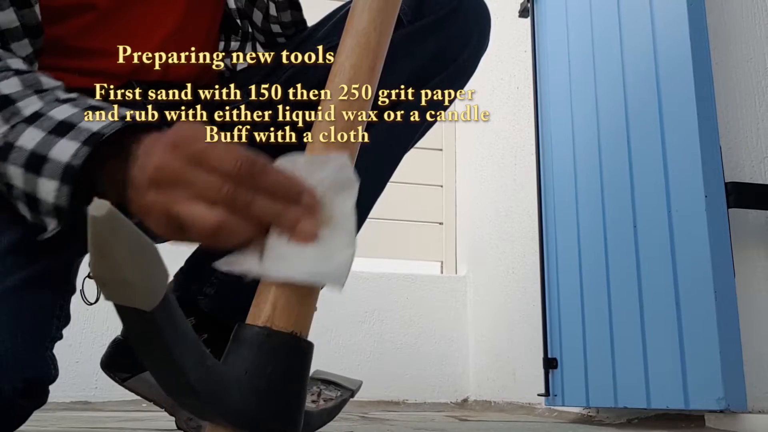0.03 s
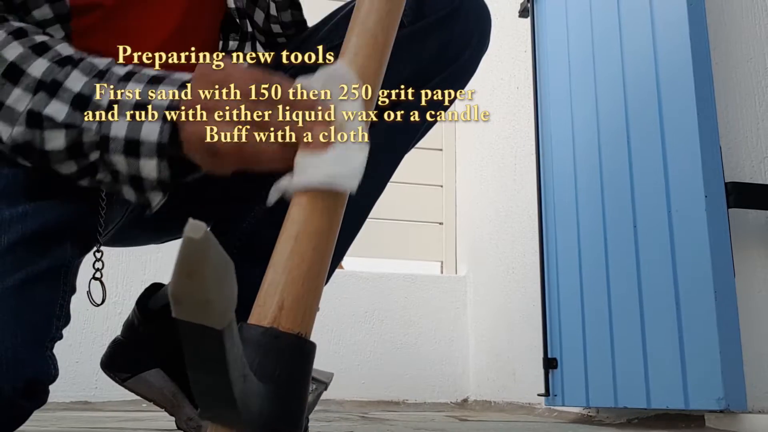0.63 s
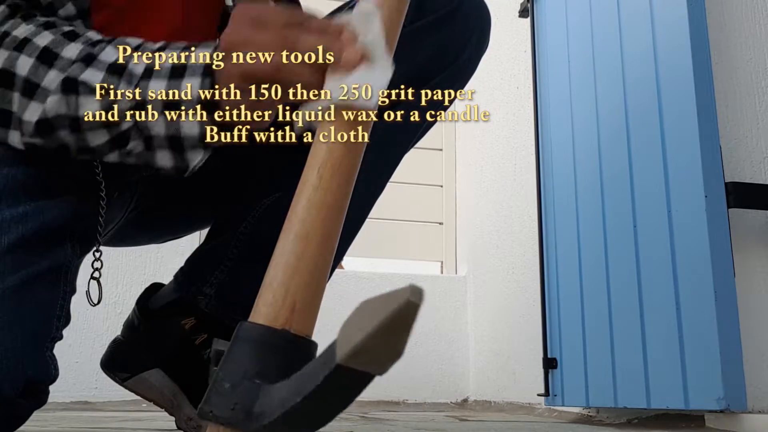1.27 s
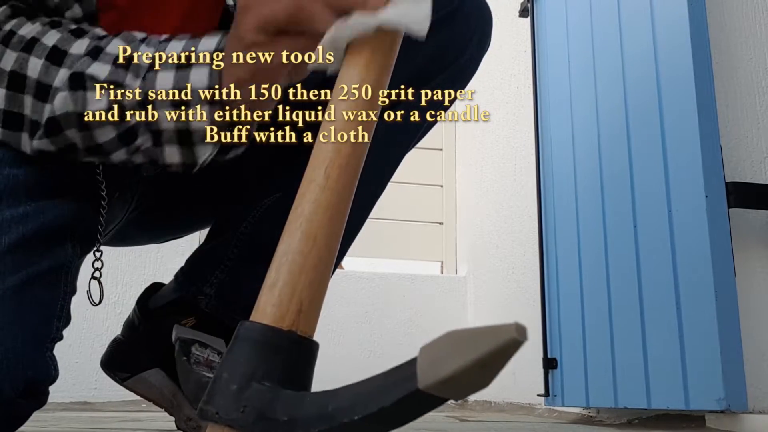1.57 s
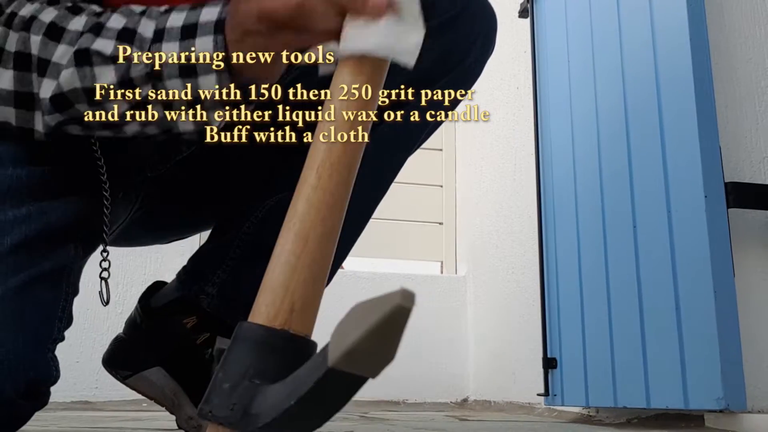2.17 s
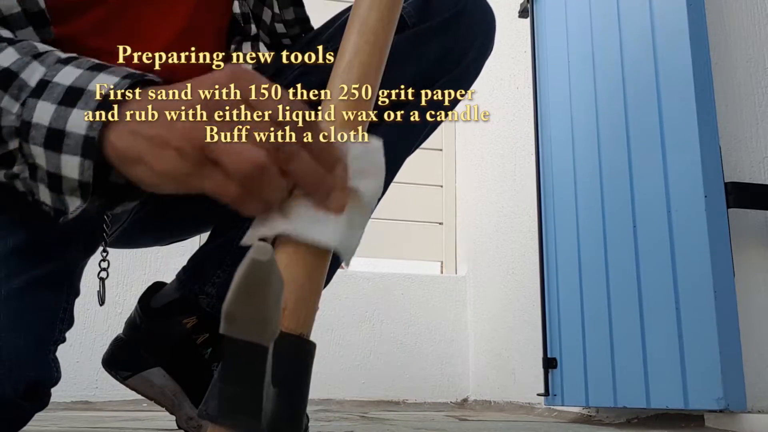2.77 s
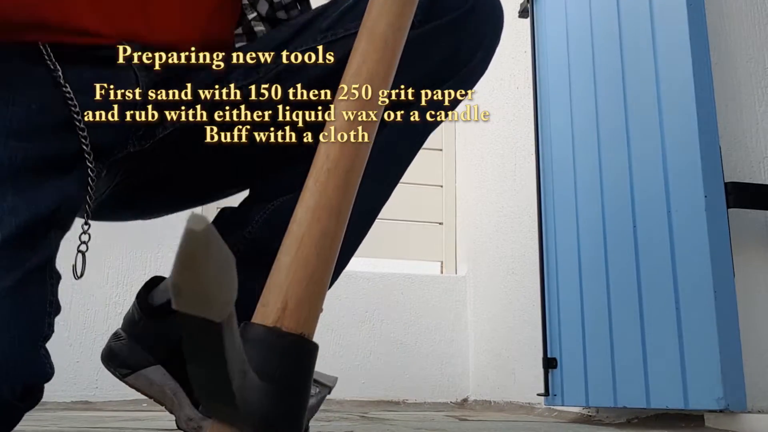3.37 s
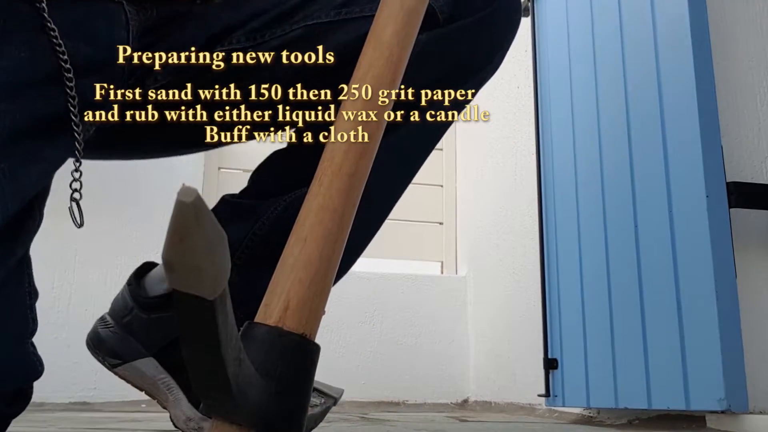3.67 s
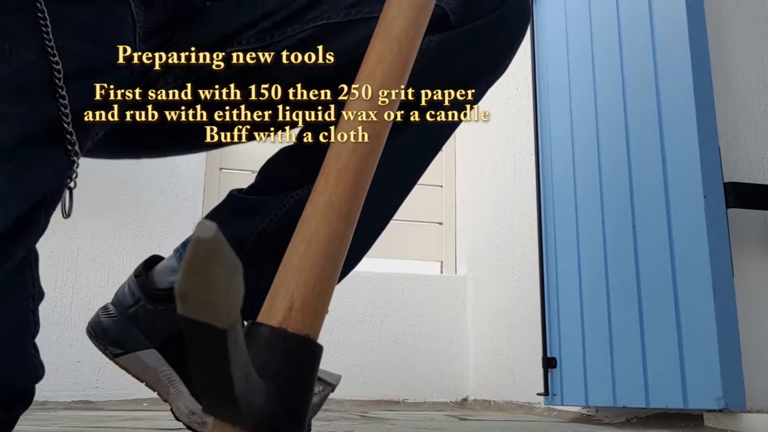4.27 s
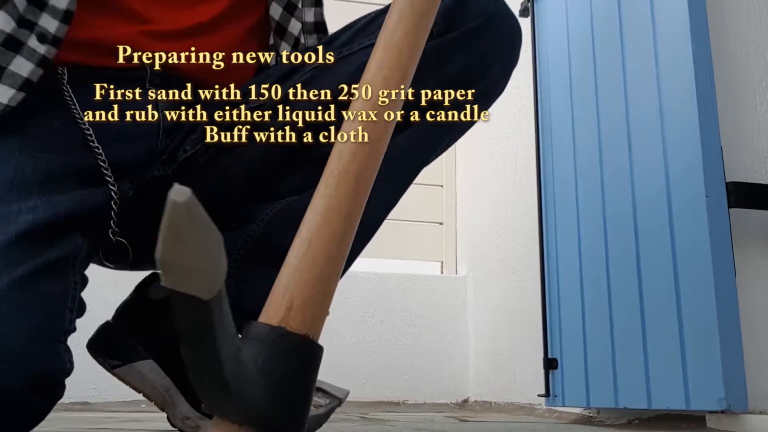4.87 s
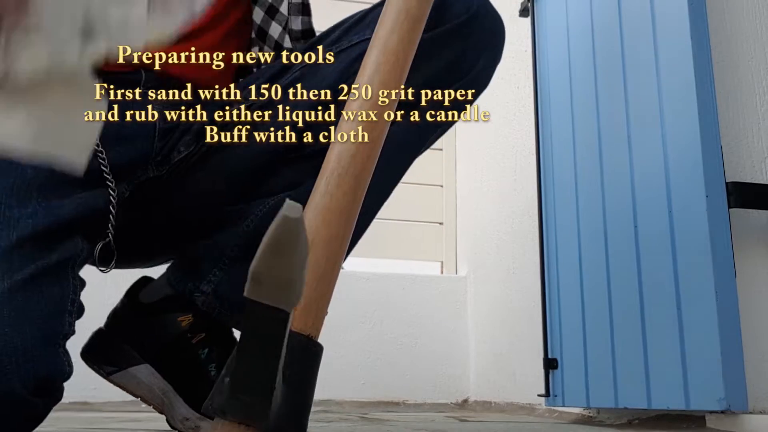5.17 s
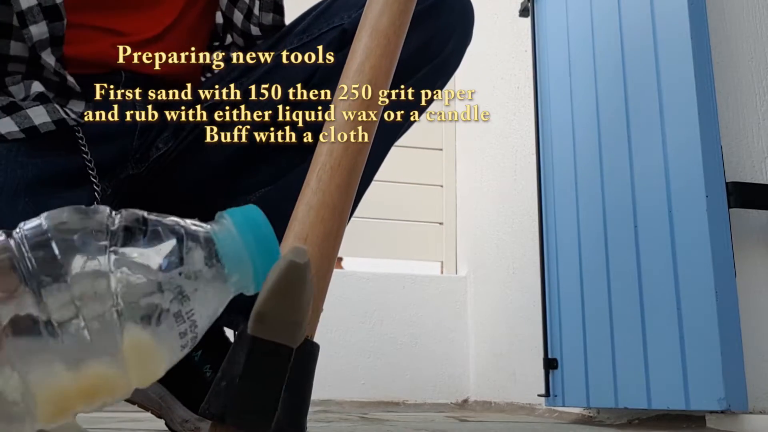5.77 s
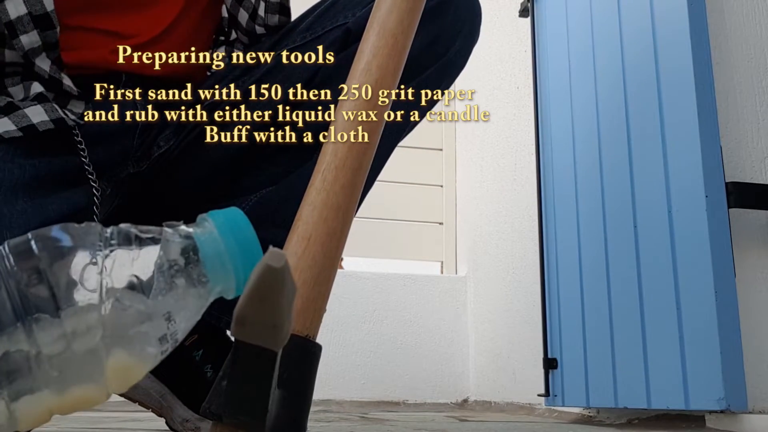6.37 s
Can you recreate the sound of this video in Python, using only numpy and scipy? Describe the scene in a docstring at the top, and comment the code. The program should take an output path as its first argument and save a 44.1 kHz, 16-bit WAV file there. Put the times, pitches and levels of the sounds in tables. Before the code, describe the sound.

A cloth swishes along a wooden tool handle, a shoe scuffs grit, then a thin plastic bottle knocks, pops and crinkles loudly.

```python
"""A cloth swishes up and down a wooden pick handle, its fibres slipping and catching, outdoors by a house wall.
The iron head rocks once with a dull thud; clothes rustle and a shoe scuffs gritty paving as the worker
shifts. Then a thin plastic bottle is picked up and brought to the tool: it knocks, its wall panels pop
and crinkle, and its contents tumble. Under it all lie a low rumble, a hiss and a far motor's faint hum."""
import sys
import numpy as np
from scipy import signal
from scipy.fft import rfft, irfft, next_fast_len
from scipy.io import wavfile
from scipy.ndimage import uniform_filter1d

SR = 44100
rng = np.random.default_rng(int(sys.argv[2]) if len(sys.argv) > 2 else 0)


def unload_audio(sound):
    """Save the sound as a 16-bit wav file, at the path given as the first command line argument."""
    columns = np.transpose(np.atleast_2d(sound))
    # keep every value between -1 and 1, then stretch to whole-number steps
    steps = np.round(np.clip(columns, -1, 1) * 32767)
    wavfile.write(sys.argv[1], SR, steps.astype(np.int16))


N = 282681
FFT_SIZE = next_fast_len(N, True)
TIME, HZ = np.arange(N) / SR, np.fft.rfftfreq(FFT_SIZE, 1 / SR)


def amp(db):
    """Decibels to gain."""
    return np.exp(np.asarray(db) * (np.log(10) / 20))


def unit(x):
    """Scales to rms 1."""
    return x / np.sqrt(np.mean(x ** 2) + 1e-20)


def over_hz(points, hz):
    """Reads an EQ curve on a log-frequency axis."""
    f, value = np.transpose(points)
    return np.interp(np.log(hz + 1), np.log(f + 1), value)


def over_time(rows, axis=1, outside=None):
    """Reads one column of an automation curve at every sample."""
    rows = np.asarray(rows)
    return np.interp(TIME, rows[:, 0], rows[:, axis], outside, outside)


def add(mix, s, sound):
    """Mixes a stereo sound in at time s."""
    part = mix[:, round(s * SR):][:, :sound.shape[1]]
    part += sound[:, :part.shape[1]]


def filtered(x, gain):
    """Applies a gain given at every frequency HZ."""
    return irfft(rfft(x, FFT_SIZE) * gain, FFT_SIZE)[..., :N]


def drift(per_s):
    """Slow random modulation of rms 1."""
    return unit(filtered(rng.standard_normal(N), 1 / (1 + (HZ / per_s) ** 4)))


def resonate(x, hz, width):
    """A resonance of gain 1 that follows the curve hz."""
    turn = np.exp(2j * np.pi * np.cumsum(hz) / SR)
    pole = np.exp(-np.pi * width / SR)
    return 2 * (turn * signal.lfilter([1 - pole], [1, -pole], x / turn)).real


def ringing(x, modes):
    """Adds steady resonances to a sound and scales it to rms 1."""
    peaks = sum(amp(db) / (1 + 2j * (HZ - hz) / width) for hz, width, db in modes)
    return unit(filtered(x, 1 + peaks))


def snap(db):
    """The causal click whose spectrum is db (given from 0 Hz to half the sample rate)."""
    log_gain = np.log(amp(np.concatenate([db, db[-2:0:-1]])))
    return np.fft.ifft(np.exp(np.conj(signal.hilbert(log_gain)))).real


def sweep(s, rise_s, fall_s):
    """Speed of one movement, 0 to 1: it gathers until time s and slows to rest."""
    lag = TIME - s
    return np.sin(np.pi / 2 * np.clip(1 - np.maximum(-lag / rise_s, lag / fall_s), 0, 1))


def sweeps(rows):
    """Envelope of a series of sliding movements."""
    return sum(amp(db) * sweep(s, rise_s, fall_s) for s, rise_s, fall_s, db in rows)


def bursts(rows, attack_s, fade_db_per_s):
    """Envelope of a series of bursts: each swells up to its start, holds and dies away."""
    each = []
    for s, hold_s, db in rows:
        attack = np.clip(1 + (TIME - s) / attack_s, 0, 1)
        each.append(attack * amp(db - fade_db_per_s * np.clip(TIME - s - hold_s, 0, 1)))
    return np.linalg.norm(each, axis=0)


# stereo image, narrow in the bass and wide on top: (frequency [Hz], left-right correlation [-1 to 1])
STEREO_IMAGE = [(60, 0.89), (150, 0.86), (300, 0.93), (640, 0.48), (1400, -0.48), (3000, 0.095),
                (15000, -0.097)]
def coloured(pair, spectrum):
    """Gives two unrelated signals an EQ curve and the stereo image, at rms 1."""
    a, b = rfft(pair, FFT_SIZE)
    same = np.clip(over_hz(STEREO_IMAGE, HZ), -1, 1)
    stereo = np.array([a, same * a + np.sqrt(1 - same ** 2) * b])
    return unit(irfft(stereo * amp(over_hz(spectrum, HZ)), FFT_SIZE)[:, :N])


def friction(spectrum, per_s, spread_db, smooth):
    """Countless tiny slips of uneven size over a smooth hiss, coloured by the surface."""
    size = amp(spread_db * np.minimum(rng.exponential(1, N), 4))
    slipping = rng.random(N) < per_s / SR
    slips = unit(size * slipping * rng.standard_normal((2, N)))
    return coloured(slips + smooth * rng.standard_normal((2, N)), spectrum)


# short outdoor reverb, dying soonest on top: (frequency [Hz], t60 [s])
YARD_DECAY = [(250, 0.36), (800, 0.28), (2100, 0.24), (5500, 0.12), (14000, 0.1)]
def yard(size=9216, rise_s=0.00071):
    """Scatter from paving, wall and body: a short tail of energy 1, each band dying at its own speed."""
    hz, t, bands = signal.stft(rng.standard_normal((2, size)), SR, nperseg=256)
    same = np.clip(over_hz(STEREO_IMAGE, hz), 0, 1)[:, None]
    bands[1] = same * bands[0] + np.sqrt(1 - same ** 2) * bands[1]
    decay = amp(-60 * t / over_hz(YARD_DECAY, hz)[:, None])
    tail = signal.istft(bands * decay, SR, nperseg=256)[1][:, :size]
    tail *= 1 - np.exp(-(np.arange(size) / SR / rise_s) ** 2)
    return unit(tail) / np.sqrt(size)


# low end of the outdoor bed: (frequency [Hz], gain [dB])
RUMBLE_EQ = [(12, -45.5), (22, -31), (34, -4), (53, 3), (80, 3.5), (113, -5), (154, 1), (190, -5),
             (290, -6), (390, -10), (500, -12.5), (700, -20), (1500, -27), (3000, -101)]
# fader ride on the rumble: (time [s], level [dB])
RUMBLE_RIDE = [(0, -55), (2.5, -53), (4.2, -51), (6.41, -52.5)]
# airy top of the bed: (frequency [Hz], gain [dB])
HISS_EQ = [(500, -17.5), (900, -3), (1150, -9.5), (1330, -7), (1520, -7.5), (2150, -12), (3000, -13),
           (4400, -7.5), (6800, -6.5), (8000, -14.5), (10500, -14), (15800, -20)]
def outdoor_air(rumble_trim_db=2, flutter_db=.7, hiss_db=-61.5):
    """A gently fluttering rumble under a steady hiss."""
    level = amp(over_time(RUMBLE_RIDE) + rumble_trim_db + flutter_db * drift(6))
    rumble = coloured(rng.standard_normal((2, N)), RUMBLE_EQ) * level
    hiss = coloured(rng.standard_normal((2, N)), HISS_EQ) * amp(hiss_db)
    return rumble + hiss


# the motor draws nearer and sags a little: (time [s], pitch [Hz], level [dB])
MOTOR_RIDE = [(0, 75.9, -66), (3.0, 77.93, -57), (3.9, 77.2, -47), (5.2, 76.76, -53.5), (6.41, 74.4, -51)]
def far_motor(fundamental_db=-6, beside_db=-5, beside_hz=134, waver=0.011, swell_db=1.0):
    """A distant motor's wavering fundamental and octave, and a weaker hum that beats with them."""
    phase = 2 * np.pi * np.cumsum(over_time(MOTOR_RIDE) * (1 + waver * drift(5.7))) / SR
    fundamental = amp(fundamental_db - swell_db * drift(8.7)) * np.sin(phase)
    octave = amp(-swell_db * drift(5.7)) * np.sin(2 * phase)
    beside = amp(beside_db) * np.sin(2 * np.pi * np.cumsum(beside_hz * (1 + waver * drift(7.9))) / SR)
    return (fundamental + octave + beside) * amp(over_time(MOTOR_RIDE, axis=2))


# soft, woolly sleeve tone: (frequency [Hz], gain [dB])
SLEEVE_EQ = [(150, 2), (300, 8.5), (600, 5.5), (950, -3.5), (1300, -2.5), (1700, -6.5), (2200, -5.5),
             (3200, -16.5), (6000, -9), (15000, -13)]
# effort of the arms, easing off as the rubbing ends: (time [s], level [dB])
ARM_EFFORT = [(0, -53), (.5, -56.5), (.7, -52.5), (2.3, -60), (3, -62), (3.8, -61), (4.7, -69)]
# thin, bright trouser tone: (frequency [Hz], gain [dB])
DENIM_EQ = [(2000, 4.5), (4500, 6.5), (7000, 3.5), (8500, -1), (12000, 3), (15500, 3)]
# shifts of the legs: (time [s], rise [s], fall [s], level [dB])
LEG_SHIFTS = [(3.35, .27, 0.46, -60.5), (3.72, 0.15, 0.27, -57), (4.095, 0.03, 0.045, -53),
              (4.55, 0.41, .2, -63.5), (4.77, 0.085, 0.2, -56.5)]
def clothes():
    """Fabric slides on fabric: sleeves rustle as the arms work, trousers swish as the legs shift."""
    arms = amp(over_time(ARM_EFFORT, outside=-100))
    sleeves = friction(SLEEVE_EQ, per_s=3000, spread_db=2, smooth=0.56) * arms
    trousers = friction(DENIM_EQ, per_s=1800, spread_db=8.0, smooth=0.98) * sweeps(LEG_SHIFTS)
    return sleeves + trousers


# sandy tone of the sole on paving: (frequency [Hz], gain [dB])
SOLE_EQ = [(200, -4.5), (450, -7.5), (850, -3), (1080, -9), (1280, -13), (1480, -10), (1750, -6),
           (2400, -8.5), (3200, -14.5), (3700, -14), (7000, -20), (8300, -28), (10000, -20.5), (15000, -24)]
# creak of the dragging sole: (frequency [Hz], width [Hz], gain [dB])
SOLE_CREAK = [(800, 90, -4), (1340, 45, 5), (1870, 73, 4), (2530, 140, 7), (2970, 140, 8)]
# scuffs of the shoe: (time [s], rise [s], fall [s], level [dB])
SCUFFS = [(3.765, 0.0051, 0.11, -46), (3.864, 0.027, 0.027, -40), (3.94, 0.037, 0.059, -56.5),
          (4.088, .014, 0.056, -57.5)]
# grit cracking under shoe and tool: (time [s], click level [dB], ring pitch [Hz], ring level [dB])
GRIT_CRACKS = [(3.326, -15.5, 1380, -46), (3.765, -27, 775, -35.5), (3.8, -1.5, 1940, -46),
               (3.862, -2.5, 1280, -37), (4.046, -22, 6350, -45)]
def shoe(crack_decay_s=0.0026, reverb_send=0.79, ring_t60_s=0.022, size=1024):
    """The sole sticks and slips over sand with a creak; single grains crack, each with a short ring."""
    slips = friction(SOLE_EQ, per_s=900, spread_db=1.5, smooth=.4)
    out = ringing(slips, SOLE_CREAK) * sweeps(SCUFFS)
    tick = snap(over_hz(SOLE_EQ, np.fft.rfftfreq(size, 1 / SR)))
    for s, click_db, ring_hz, ring_db in GRIT_CRACKS:
        tail = yard()
        t = np.arange(tail.shape[1]) / SR
        crack = unit(rng.standard_normal(tail.shape) * np.exp(-t / crack_decay_s)) / np.sqrt(len(t))
        add(out, s, amp(click_db) * signal.fftconvolve(crack + reverb_send * tail, tick[None], axes=1))
        ring = np.sin(2 * np.pi * (ring_hz * t + rng.random((2, 1))))
        add(out, s, amp(ring_db - 60 * t / ring_t60_s) * ring)
    return out


# dull weight of iron on paving: (frequency [Hz], gain [dB])
THUD_EQ = [(70, -12), (160, 3), (215, -9), (280, -7), (400, -0.5), (560, -7.5), (800, -10), (1300, -18),
           (2300, -22), (3500, -29), (8000, -37)]
# the head rocks once: (start [s], hold [s], level [dB])
HEAD_ROCK = [(.595, 0.041, -37.5)]
def tool_head(handle_hz=285, handle_width_hz=45, handle_db=-3):
    """The iron rolls over bumps in the paving: a quick run of dull blows that hum in the handle."""
    blows = friction(THUD_EQ, per_s=1500, spread_db=0, smooth=1)
    handle = unit(resonate(blows, np.full(N, handle_hz), handle_width_hz))
    return unit(blows + amp(handle_db) * handle) * bursts(HEAD_ROCK, attack_s=0.025, fade_db_per_s=324)


# strokes, up and down in turn: (fastest at [s], rise [s], fall [s], level [dB], fizz offset [dB])
CLOTH_STROKES = [(.02, .06, 0.058, -63, 3), (.24, 0.2, 0.077, -51.5, -4), (.425, 0.19, 0.16, -55, -2.5),
                 (.75, 0.17, 0.12, -49.5, -4.5), (.97, 0.12, 0.17, -52, -3), (1.285, 0.1, 0.16, -50, -2.5),
                 (1.58, 0.14, 0.11, -50.5, -3.5), (1.775, 0.12, 0.087, -55.5, 1),
                 (2.12, 0.33, 0.22, -54, -1.5), (2.56, 0.31, 0.27, -57.5, -0.5),
                 (2.78, .12, .1, -62.5, 1.5)]
# dry, bright tone of cloth on wood: (frequency [Hz], gain [dB])
CLOTH_EQ = [(1500, -3.5), (2300, -10), (3200, -1.5), (4200, 1), (5700, -3), (7000, 0), (8100, -12.5),
            (10000, -16.5), (12500, -17.5), (15500, -15.5)]
def cloth_rub(swish_db=-2.0, fizz_db=0.3, flutter_db=1.43, wander=.035, sheen=1.8, fizz_lag_s=0.01):
    """Fibres slip on the waxed wood: a swish and a fizz that grow louder and brighter with hand speed."""
    rub = friction(CLOTH_EQ, per_s=20000, spread_db=1, smooth=1)
    highs = filtered(rub, 1 / (1 + (8500 / (HZ + 1)) ** 12))
    lows = rub - highs
    stroke_speeds = np.array([sweep(s, rise_s, fall_s) for s, rise_s, fall_s, _, _ in CLOTH_STROKES])
    level_db, fizz_offset_db = np.transpose(CLOTH_STROKES)[-2:]
    drive = stroke_speeds ** 0.83 * amp(flutter_db * drift(26))
    # both peaks climb from their resting pitch as the hand speeds up
    hand_speed = stroke_speeds.max(axis=0)
    swish_hz = (4360 + 1470 * hand_speed) * (1 + wander * drift(9))
    fizz_hz = (11150 + 2350 * hand_speed) * (1 + wander * drift(9))
    swish = unit(lows + sheen * resonate(lows, swish_hz, width=800))
    fizz = unit(resonate(highs, fizz_hz, width=3300))
    swish_gain = amp(level_db + swish_db) @ drive
    fizz_gain = np.interp(TIME - fizz_lag_s, TIME, amp(level_db + fizz_offset_db + fizz_db) @ drive)
    return swish * swish_gain + fizz * fizz_gain


# midrange bite of the catching cloth: (frequency [Hz], gain [dB])
RASP_EQ = [(700, -26), (1400, 3.5), (2200, 9), (2900, 5), (3800, 4), (4800, -10), (8000, -35)]
# woody resonances of the handle: (frequency [Hz], width [Hz], gain [dB])
HANDLE_MODES = [(1390, 110, -11), (2100, 390, -18), (3900, 210, -8.5)]
# moments when the cloth catches: (time [s], rise [s], fall [s], level [dB])
CLOTH_CATCHES = [(.14, 0.054, 0.039, -59), (1.215, 0.026, 0.12, -62.5), (1.81, 0.08, 0.1, -56),
                 (1.95, 0.075, 0.064, -60.5), (2.67, 0.052, 0.42, -66.5)]
def cloth_rasp():
    """The cloth catches on the wood, and its coarser slips ring in the handle."""
    slips = friction(RASP_EQ, per_s=700, spread_db=3, smooth=.5)
    return ringing(slips, HANDLE_MODES) * sweeps(CLOTH_CATCHES)


# body of the bottle at a tuning factor of 1: (frequency [Hz], level [dB], t60 [s])
BOTTLE_MODES = [(282.5, -45.5, 0.21), (502.5, -29.5, 0.084), (679, -28, 0.064), (747.7, -23.5, 0.11),
                (1510, -40, 0.1), (2180, -39, 0.1), (2565, -45, 0.12), (2970, -36.5, 0.041),
                (4870, -54, 0.18), (5470, -56, 0.12), (6730, -22, 0.018)]
# the grip tightens the thin wall and retunes the bottle: (time [s], tuning [factor])
GRIP_TUNING = [(4.87, 0.88), (5.06, 0.7), (5.25, 0.96), (5.3, 1.004), (5.55, 0.75), (5.86, 1)]
def bottle_ring(s, ring_db, rise_s=0.00039, detune=0.005, size=9216):
    """The whole bottle rings in its modes, tuned by the grip at time s."""
    t = np.arange(size) / SR
    tuning = np.interp(s, *np.transpose(GRIP_TUNING))
    modes = np.zeros(size)
    for hz, db, t60 in BOTTLE_MODES:
        tuned_hz = hz * tuning * (1 + detune * rng.standard_normal())
        modes += amp(db - 60 * t / t60) * np.sin(2 * np.pi * (tuned_hz * t + rng.random()))
    return amp(ring_db) * modes * (1 - np.exp(-t / rise_s))


# hollow note of one wall panel: (pitch [ratio], level [dB], 60 dB decay [cycles])
PANEL_MODES = [(1, 2.5, 104), (1.07, -11, 39), (2.8, -6, 170)]
def panel_ring(pitch_hz, level_db, rise_s=0.00028, size=9216):
    """The flipped panel rings on at its own pitch; higher-pitched panels die sooner."""
    t = np.arange(size) / SR
    modes = sum(amp(db - 60 * t * pitch_hz * ratio / cycles) * np.sin(2 * np.pi * pitch_hz * ratio * t)
                for ratio, db, cycles in PANEL_MODES)
    return amp(level_db) * modes * (1 - np.exp(-t / rise_s))


def shiver(t, buckle_s, stereo_spread=0.81):
    """Buckling plastic: a brief run of tiny snaps with an even spectrum and energy 1."""
    snaps = rng.standard_normal((3, len(t))) * np.exp(-t / buckle_s)
    stereo = snaps[0] + stereo_spread * snaps[1:]
    whitened = irfft(np.exp(1j * np.angle(rfft(stereo))), len(t))
    return unit(whitened * np.exp(-(t / (4 * buckle_s)) ** 2)) / np.sqrt(len(t))


# crack of a pop before its tilt: (frequency [Hz], gain [dB])
CRACK_EQ = [(2000, -1.2), (5200, -2), (12500, -10.5)]
# EQ bands on the pops, bright overall, with a slight dip near 8.6 kHz: # (frequency [Hz], width [Hz], gain
# [dB])
POP_BANDS = [(1030, 260, -5.5), (1510, 170, -4), (1940, 180, -1.5), (2650, 680, -5), (4500, 530, 3),
             (6300, 1700, 5), (8600, 1500, -2), (11900, 2400, 5), (16400, 1600, -7)]
def pop_click(thump_db, tilt, crack_hz, thump_hz=600, pivot_hz=5230, low_cut_hz=400, size=2048):
    """One panel's click: a low thump and a crack tilted about the pivot, with a bright, plasticky EQ."""
    hz = np.fft.rfftfreq(size, 1 / SR)
    crack = [(f, db + tilt * np.log2(f / pivot_hz)) for f, db in CRACK_EQ]
    colour_db = over_hz([(thump_hz, thump_db)] + crack, hz)
    colour_db -= 10 * np.log10(1 + (low_cut_hz / (hz + 10)) ** 6)
    colour_db += sum(db / (1 + (2 * (hz - f) / width) ** 4) for f, width, db in POP_BANDS)
    # every panel has one main resonance and many weak ones of its own
    colour_db += 8 / (1 + ((hz / crack_hz - 1) / 0.13) ** 2)
    ripple = unit(uniform_filter1d(uniform_filter1d(rng.standard_normal(len(hz)), size=11), size=11))
    colour_db += 2.5 * ripple * np.minimum(hz / 2500, 1)
    return snap(np.maximum(colour_db, -80))


def panel_flip(click, reverb_db, buckle_s, click_gain=0.63, bounce_gain=0.31, shiver_db=1.0):
    """A wall panel flips: its click, a brief shiver, the bounce off the ground and the yard's tail."""
    tail = yard()
    t = np.arange(tail.shape[1]) / SR
    direct = amp(shiver_db) * shiver(t, buckle_s)
    direct[:, 0] += click_gain
    direct[:, round(rng.uniform(.0011, .0015) * SR)] += bounce_gain
    return signal.fftconvolve(direct + amp(reverb_db) * tail, click[None], axes=1)[:, :len(t)]


# knocks and pops, among them two quick repeats about 9 ms after the hits at 5.054 and 5.863 s; # thump, reverb
# and rings are relative to the level: # (time [s], level [dB], thump [dB], tilt [dB/octave], reverb [dB],
# bottle ring [dB], # buckling time [s], crack peak [Hz], panel pitch [Hz], panel ring [dB])
BOTTLE_HITS = [(4.784, -19, 6, 1.5, -1, -19, 0.0027, 4430, 1300, -42),
               (4.8626, -6.5, 4.5, 3, 4, 8, 0.0011, 4080, 902, -15.5),
               (4.8907, -7.5, 10, 0.5, 4, 1.5, .002, 14000, 810, -27),
               (4.9025, -12, -14, -7, 3, -3, 0.0019, 12500, 1030, -30),
               (4.923, -15, -9, -9, -6, -12, .003, 3600, 1270, -30),
               (5.0544, -1.5, 2, 6, -0.5, -6.5, 0.0027, 4350, 1386, -25.5),
               (5.062, -11, 7.5, -9, 10, 0, 0.0014, 7150, 735, -28),
               (5.0732, -8.5, 3, 5.5, 5.5, -7, 0.0023, 14160, 858, -24.5),
               (5.0944, -9.5, -13, 4.5, 1, -25, 0.0022, 12100, 1260, -34),
               (5.1537, -23, -4, 7, 5, -18, .002, 4330, 1490, -25),
               (5.2522, 11, -7, 0.6, -6, -27, 0.0012, 4650, 1565, -46),
               (5.284, 10, 3.5, -3.5, -12, -0.5, 0.0014, 4670, 1616, -32.5),
               (5.3828, -18.5, -14, 5, -2, -4, 0.0014, 12800, 1510, -38),
               (5.5117, -4, -4, -1, -6.5, -26, 0.001, 10300, 1220, -36),
               (5.549, -2, 13.5, -6.5, -15, -6.5, 0.00057, 4060, 406, -40),
               (5.59, -10, 1, -4, 0, -15, .0012, 1240, 1100, -38),
               (5.656, -23, -13, 3, -12, -20, .001, 4800, 2100, -21),
               (5.6765, -17.5, -23, -1, 4, -26, .0007, 4610, 1640, -42),
               (5.683, -21, -20, 3, -5, -24, 0.0012, 11000, 2280, -27),
               (5.686, -18, -28, -4, 6, -24, .001, 13500, 2500, -34),
               (5.6957, -16, -24, 5, -5, -24, 0.0012, 10400, 2340, -22),
               (5.7002, -9.5, -23, 3, -10, -36, 0.0004, 4300, 2550, -30),
               (5.7215, -19.5, -21, 3, -14, -24, 0.001, 12280, 2400, -29),
               (5.7613, -1, -14, -3.5, -5, -31, 0.00095, 6960, 2180, -39),
               (5.8379, -13.5, 1, 0, -15, -13, 0.00061, 3600, 2500, -39),
               (5.841, -12.5, -9, -1.5, -4, -15, .0006, 13890, 2200, -43),
               (5.863, 11, -2, 1.5, -5, -6, 0.00041, 5630, 2073, -34),
               (5.8718, -2.5, 4, 1, 0, -3.5, .0014, 5300, 1760, -25.5),
               (6.044, -10, 10, -3.5, -4.5, -4.5, 0.00042, 4400, 2100, -56)]
def bottle_pops(trim_db=-3.5, lead_s=.0005, left_lag_s=.00044):
    """Each row flips a panel and sets bottle and panel ringing; two hits sound again about 9 ms later; every
    hit reaches the left later."""
    hits = np.zeros((2, N))
    for s, db, thump_db, tilt, reverb_db, ring_db, buckle_s, crack_hz, panel_hz, panel_db in BOTTLE_HITS:
        flip = panel_flip(pop_click(thump_db, tilt, crack_hz), reverb_db, buckle_s)
        sound = flip + bottle_ring(s, ring_db) + panel_ring(panel_hz, panel_db)
        add(hits, s - lead_s, amp(trim_db + db) * sound)
    hits[0] = np.roll(hits[0], round(left_lag_s * SR))
    return hits


# crisp tone of creasing plastic: (frequency [Hz], gain [dB])
CREASE_EQ = [(300, -8), (1000, 7), (2300, 9), (4800, 3.5), (7000, 3.5), (8500, -2), (11000, 3.5),
             (15500, 3)]
# squeezes of the hand: (start [s], hold [s], level [dB])
GRIP_SQUEEZES = [(4.755, 0.031, -61), (4.87, 0.024, -41), (4.97, 0.051, -56.5), (5.07, 0.13, -56.5),
                 (5.26, 0.047, -43), (5.508, 0.0079, -39), (5.555, 0.089, -49), (5.68, 0.0094, -46.5),
                 (5.79, 0.19, -55)]
def bottle_crinkle():
    """Each squeeze creases the thin plastic into a fine crackle."""
    creases = friction(CREASE_EQ, per_s=1500, spread_db=4.0, smooth=1.0)
    return creases * bursts(GRIP_SQUEEZES, attack_s=0.0055, fade_db_per_s=207)


# muffled, bassy tone of the contents: (frequency [Hz], gain [dB])
CONTENTS_EQ = [(30, -12), (60, 12), (150, 6), (250, 10), (420, 2.5), (600, -10), (900, -4), (1200, -1.5),
               (2200, -11.5), (4000, -10), (8000, -43)]
# jolts to the bottle: (start [s], hold [s], level [dB])
BOTTLE_JOLTS = [(4.866, 0.0056, -33.5), (5.058, 0.0032, -37), (5.553, 0.0096, -34), (5.6, .025, -44.5),
                (5.867, 0.0016, -37)]
def bottle_contents():
    """Each jolt tumbles the contents in a short, low rattle."""
    tumble = friction(CONTENTS_EQ, per_s=900, spread_db=2.5, smooth=0.98)
    return tumble * bursts(BOTTLE_JOLTS, attack_s=0.0062, fade_db_per_s=304)


def scene():
    """The stereo mix: the outdoor bed, the work on the tool, then the bottle."""
    bed = outdoor_air() + far_motor()
    work = cloth_rub() + cloth_rasp() + clothes() + tool_head() + shoe()
    bottle = bottle_pops() + bottle_crinkle() + bottle_contents()
    return bed + work + bottle


def record(dry, bass_lean_db=.5, ceiling=.9, high_cut_hz=15900):
    """The bass leans a little to the right, the loudest pops saturate softly, and the very top is cut."""
    lean = amp(np.array([[-1], [1]]) * bass_lean_db / (1 + (HZ / 1200) ** 2))
    saturated = ceiling * np.tanh(filtered(dry, lean) / ceiling)
    low_pass = signal.firwin(301, high_cut_hz, window=("kaiser", 9), fs=SR)
    return signal.oaconvolve(saturated, low_pass[None], "same")


dry = scene()
out = record(dry)
unload_audio(out)
```